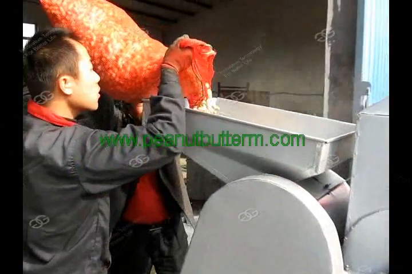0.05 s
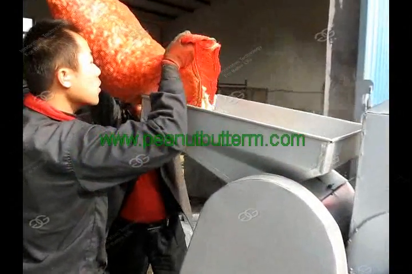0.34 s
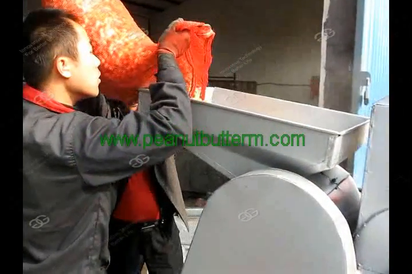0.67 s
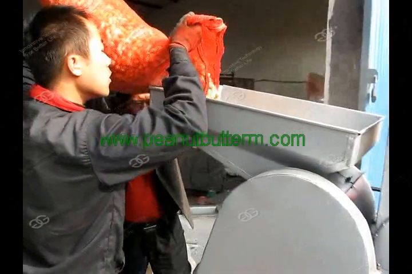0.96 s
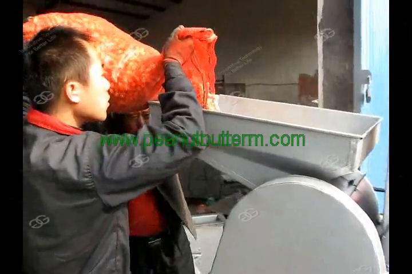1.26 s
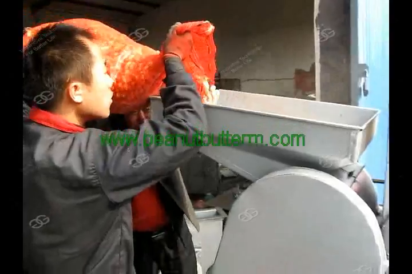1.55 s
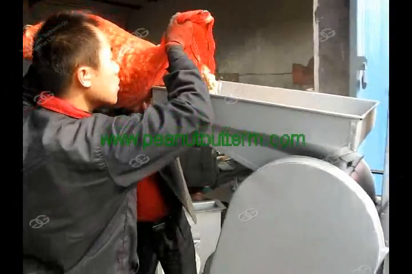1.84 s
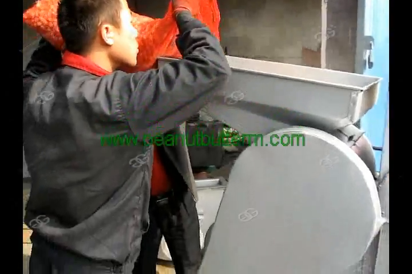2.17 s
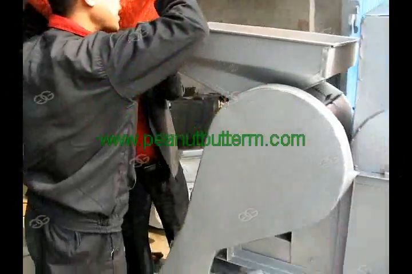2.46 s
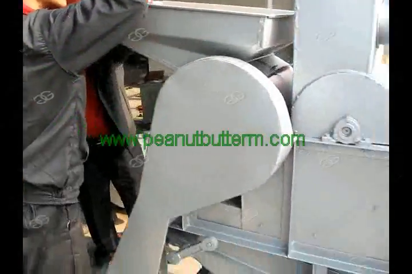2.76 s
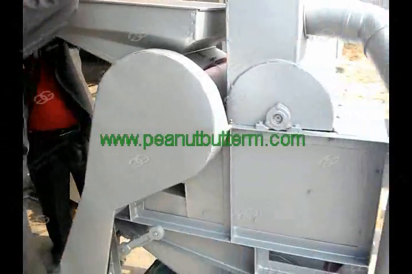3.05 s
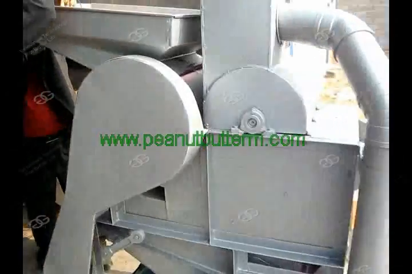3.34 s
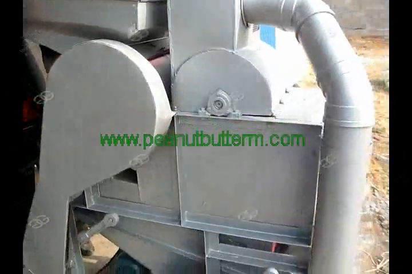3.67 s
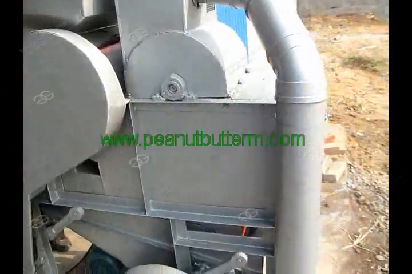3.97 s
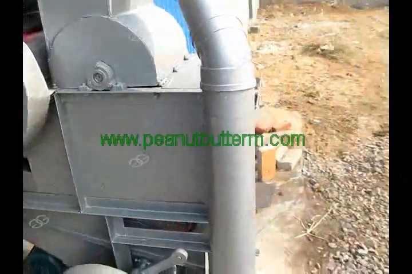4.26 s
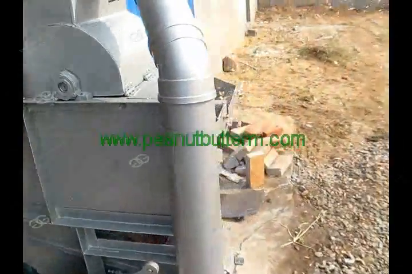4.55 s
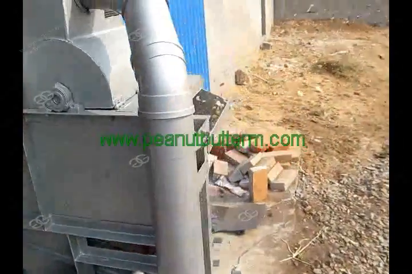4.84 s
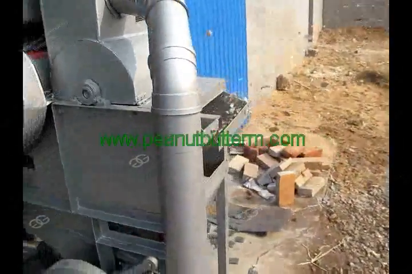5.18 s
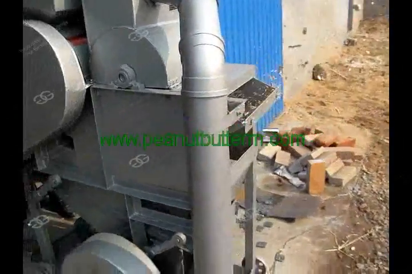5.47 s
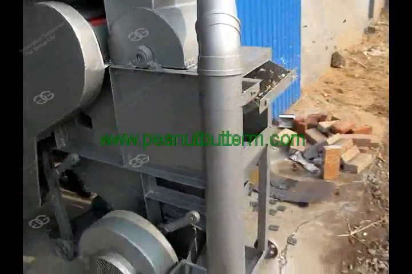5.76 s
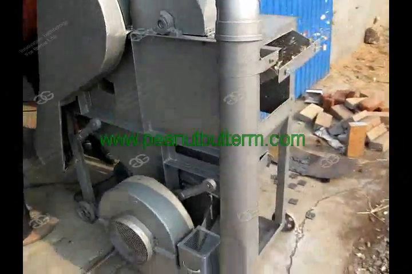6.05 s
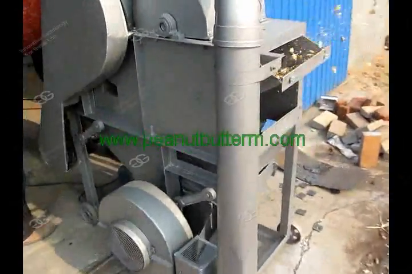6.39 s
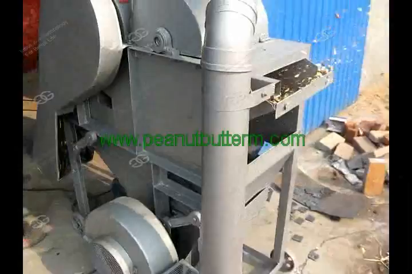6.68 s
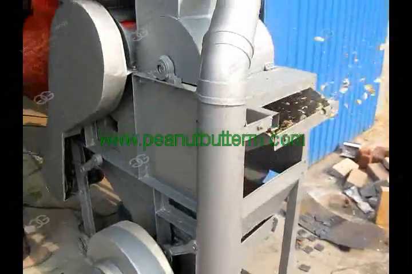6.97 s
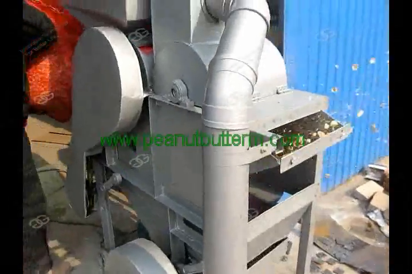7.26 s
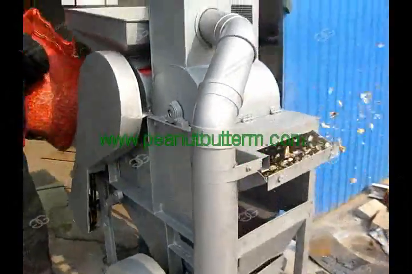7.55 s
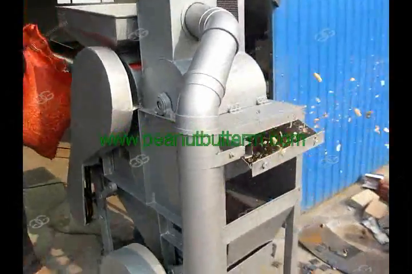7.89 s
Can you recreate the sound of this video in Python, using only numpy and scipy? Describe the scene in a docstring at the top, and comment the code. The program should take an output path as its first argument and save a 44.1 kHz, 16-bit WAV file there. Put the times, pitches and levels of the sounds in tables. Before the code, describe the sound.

Heard close up outdoors, a farm sheller churns through peanuts from start to finish. Its spinning drum makes a rough, rapidly pulsing clatter of pods, topped by the crackle and hiss of breaking shells. Sharp metallic clicks and occasional soft hollow knocks come at irregular moments, while the steel casing rumbles and a fan hums quietly below. The level stays fairly even, with the colour changing gently as the listener walks around it.

```python
"""A peanut sheller runs in a yard, heard by a listener walking round it. Its beater drum turns about
twenty times a second and modulates the noise of many impacts: pods tumble and brittle shells snap,
louder as clumps drop in and softer at gaps in the feed. Kernels ping on the sieve wires, and single
nuts crack and knock against sheet steel that rings in its modes. Underneath, air booms in the
hollow casing and a blower hums; ground and wall return faint echoes of the rattle."""
import sys
import numpy as np
from scipy import signal
from scipy.fft import rfft, irfft, next_fast_len
from scipy.io import wavfile

SR = 44100
rng = np.random.default_rng(int(sys.argv[2]) if len(sys.argv) > 2 else 0)


def output_pcm(signal):
    """Save a mono or channel-first signal as 16-bit PCM at the path in sys.argv[1].

    Samples are clipped to [-1, 1] before scaling.
    """
    pcm = np.clip(np.atleast_2d(signal).T, -1, 1) * 32767
    wavfile.write(sys.argv[1], SR, np.round(pcm).astype(np.int16))


N = 353682
TIME = np.arange(N) / SR
PANEL_BLOWS_PER_S = 200  # on each mode

# modes of the sheet steel: (frequency [Hz], relative level [dB])
STEEL_MODES = [(538, -5.5), (575, -10.5), (635, -7.5), (820, -4.5), (1141, -18), (1655, -13.5),
               (2120, -0.5), (2170, -1), (2300, 0.5), (2410, -1.5), (2790, -4), (3030, -4.5), (3300, 0),
               (3400, 0.5), (3510, -4.5), (3640, -2), (3843, -1.5), (4059, 0.5), (4190, -6), (4560, -7.5),
               (4870, -4.5), (5400, -19), (5530, -12.5), (6200, -26.5)]
# clumps entering the drum: (centre [s], duration [s], pod rise [dB], shell rise [dB], boom rise [dB])
FEED_CLUMPS = [(0.183, 0.075, 1, 3, 3), (0.368, 0.24, 1.5, 1.9, -2), (0.782, 0.079, 1.5, 3, 6),
               (.93, 0.087, -1.5, 2, -4), (1.12, 0.053, -0.5, 3.5, 2), (1.247, 0.13, 2, 1, 3.5),
               (1.438, 0.26, 1, 0.9, 6), (1.656, 0.074, 2.5, 2, -7), (1.895, 0.4, 2.5, 1.2, 6.5),
               (2.265, 0.063, 2, 2.5, 6), (2.464, 0.063, 3, 1, 4), (2.588, 0.1, 3.5, 0, 6.5),
               (2.761, 0.16, 0, 0.5, 8), (2.962, 0.093, 3, 1.5, 10), (3.21, 0.083, -0.5, 1, 12),
               (3.44, 0.19, 4, 2.5, 4.5), (4.178, 0.51, -1, 0.5, 2.5), (4.535, 0.1, -1, -0.2, 4),
               (4.953, 0.13, 2.5, 0.5, 7), (5.24, 0.11, 3, 1.5, 1), (5.374, 0.27, 2, -1, -5),
               (5.47, 0.27, 0.5, 2, 1), (5.736, 0.084, 3.5, 2.5, 3.5), (5.97, 0.27, 1, 1.5, 2.5),
               (6.363, 0.13, 2.5, 0.5, 4), (6.532, 0.17, 2, 0.5, -1), (6.874, 0.22, 2, 1, 3),
               (7.74, 0.28, 1.5, 0, 4)]


def pods(level_db, panel_db):
    """Dense impacts of tumbling pods merge into noise, shaped by three resonances of the hopper panel."""
    # tumbling pods: (frequency [Hz], relative spectral level [dB])
    pod_spectrum = [(150, -25), (230, -20), (300, 1.5), (440, -1.5), (560, 3), (650, 2), (730, -0.5),
                    (910, 0.5), (1030, -4.5), (1250, -7), (1500, -12.5), (2200, -30.5), (4000, -64)]
    tumble = unit_rms(impacts(per_s=4000, spread_db=2.5)) + 1.06 * rng.standard_normal(N)
    body = coloured(tumble * grate_flutter(depth=0.05), pod_spectrum)
    body = lifted(body, hz=456, width_hz=170, db=panel_db)
    body = lifted(body, hz=330, width_hz=35, db=panel_db)
    body = lifted(body, hz=1090, width_hz=100, db=0.5 * panel_db)
    return gain_of(level_db) * body * beater(depth_db=0.5, lead_turns=-0.061)


def shells(level_db, chute_db, sieve_db, bright_db):
    """Brittle fracture: each snap is a damped ring, heard with kernels and the hiss of blown husks."""
    snaps = sum(resonance(impacts(per_s=600, spread_db=1.0), hz, width_hz=640)
                for hz in np.linspace(2200, 6800, 10))
    husk_splits = resonance(impacts(per_s=300, spread_db=4.0), hz=5450, width_hz=550)
    hiss = rng.standard_normal(N)
    # breaking shells: (frequency [Hz], relative spectral level [dB])
    shell_spectrum = [(900, -30.5), (1500, -17.5), (1660, -3.5), (1850, -2.5), (2150, 2), (2380, 2),
                      (2650, -1), (3150, -2.5), (3500, -1), (4100, -1.5), (4850, -5), (5550, -15.5),
                      (6300, -18.5), (7200, -42.5)]
    crackle = unit_rms(snaps) + hiss + 0.5 * kernels() + 0.5 * unit_rms(husk_splits)
    crackle = coloured(crackle, shell_spectrum)
    crackle = lifted(crackle, hz=1630, width_hz=150, db=chute_db)
    crackle = lifted(crackle, hz=3770, width_hz=1000, db=0.7 * sieve_db)
    # the sharpest snaps come just as the beater strikes
    treble = signal.sosfiltfilt(signal.butter(2, 4000, "high", fs=SR, output="sos"), crackle)
    sharp = treble * gain_of(bright_db) * beater(depth_db=1.9, lead_turns=-0.28)
    dull = (crackle - treble) * beater(depth_db=0.7, lead_turns=-0.19)
    bunching_db = 0.47 * wander(per_s=64)  # shells break in small uneven bunches
    return gain_of(level_db + bunching_db) * (dull + sharp) * grate_flutter(depth=0.046)


def beater(depth_db, lead_turns):
    """Amplitude modulation: the beater sweeps through the heap once a turn."""
    # drum rotation: (time [s], speed [turns/s])
    drum_speed = [(0, 20.55), (.5, 20.45), (1.0, 19.96), (2.0, 20.18), (3.0, 20.18), (3.6, 20.05),
                  (4.6, 20.2), (5.4, 20.08), (6.0, 20.2), (6.5, 20.08), (7.0, 20.34), (7.5, 20.0),
                  (8.0, 20.0)]
    turns = np.cumsum(follow(drum_speed)[0]) / SR + lead_turns
    return unit_rms(gain_of(depth_db * np.cos(2 * np.pi * turns)))


def grate_flutter(depth, bar_hz=107.8):
    """Pods dragged over the grate bars modulate the rattle fast enough to be heard as roughness."""
    return 1 + depth * np.sin(2 * np.pi * bar_hz * TIME)


def feed(empty_s=0.0066):
    """Impact noise follows the load: clumps and gaps set the levels of pods, shells and boom in dB."""
    # running levels: (time [s], pods [dB], shells [dB], casing boom [dB])
    running_levels = [(0, -27.5, -26, -35.5), (1, -28, -26.5, -37.5), (2, -28.5, -26.5, -39.5),
                      (3, -27.5, -25, -39.5), (4, -25.5, -25.5, -34), (5, -28, -24, -32.5),
                      (6, -28, -25, -36), (7, -28.5, -25, -35), (8, -27.5, -23.5, -36.5)]
    # the heap breaks through and the drum starves: (start [s], refill time [s], pod dip [dB])
    feed_gaps = [(.402, 0.1, -1.5), (.64, 0.05, -2), (.79, 0.061, -2), (.997, 0.14, -1.1),
                 (1.315, 0.036, -2), (1.555, 0.054, -2), (1.7, 0.08, -1.5), (2.035, 0.066, -0.5),
                 (2.19, 0.043, -1.5), (2.79, .09, -1.5), (3.0, 0.16, -3.5), (3.54, 0.065, -2.5),
                 (4.365, 0.088, -2), (4.735, 0.13, -3), (5.06, 0.17, -2), (6.022, 0.044, -3),
                 (6.12, .045, -2), (6.557, 0.077, -2.5), (6.712, 0.14, -3), (7.24, 0.039, -0.5),
                 (7.5, 0.19, -1.5)]
    pods_db, shells_db, boom_db = follow(running_levels)
    for s, length, pods_rise, shells_rise, boom_rise in FEED_CLUMPS:
        clump = swell(s, length)
        pods_db += pods_rise * clump
        shells_db += shells_rise * clump
        boom_db += boom_rise * clump
    gap_db = np.zeros(N)
    for s, refill_s, dip_db in feed_gaps:
        emptying = np.interp(TIME - s, [0, empty_s], [0, 1])
        gap_db += dip_db * emptying * swell(s, 2 * refill_s)
    churn_db = 0.02 * wander(per_s=14)  # the heap shifts at random
    return pods_db + gap_db + churn_db, shells_db + 1.25 * gap_db + churn_db, boom_db + 1.5 * gap_db


def cushioning():
    """Softer impacts carry less treble: a heavy clump cushions the beater, lowering brightness in dB."""
    return -0.35 * sum(pods_rise * swell(s, length) for s, length, pods_rise, _, _ in FEED_CLUMPS)


def kernels(wires=44):
    """Impulse response: each kernel lands on one sieve wire, which pings at its natural frequency."""
    pitches = np.linspace(2900, 6000, wires) + rng.uniform(-36.5, 35, wires)
    return unit_rms(sum(resonance(impacts(per_s=9, spread_db=0.5), hz, width_hz=24) for hz in pitches))


def nut_cracks(t60_s=0.043, clatter_s=0.0056):
    """Modal ringing: a nut shatters on the steel, and each point struck excites its own mix of modes."""
    # single nuts: (time [s], peak level [dB], centre frequency [Hz], bandwidth [Hz])
    strikes = [(.165, -18, 3700, 1200), (0.546, -21, 3900, 2500), (.595, -19, 4200, 2000),
               (0.848, -15, 4110, 2500), (.932, -19, 4300, 1500), (1.235, -19, 4000, 1500),
               (1.54, -19, 4000, 1200), (1.686, -19, 3880, 1200), (1.789, -16, 3750, 1490),
               (1.946, -17.5, 4200, 1500), (1.984, -19, 3860, 1500), (2.081, -17, 3840, 1500),
               (2.146, -14.5, 3870, 2500), (2.633, -17.5, 3700, 1000), (2.978, -18, 3600, 1500),
               (3.124, -14.5, 4150, 400), (3.179, -21, 4600, 2000), (3.329, -15, 3200, 1800),
               (3.533, -16, 4900, 3000), (4.022, -17, 3850, 2500), (4.215, -15, 3470, 2500),
               (4.467, -16, 4000, 1500), (4.711, -14.5, 3900, 1500), (6.013, -14, 3670, 1200),
               (6.528, -18, 3900, 1500), (6.643, -17, 3950, 1200), (6.903, -16, 4500, 2500),
               (7.199, -17, 4100, 800), (7.351, -21, 3600, 1200), (7.489, -15, 3410, 2500),
               (7.591, -14, 3900, 1500), (7.678, -14, 3700, 1500), (7.811, -15, 3700, 2000)]
    out, t = np.zeros(N), np.arange(SR // 15) / SR
    hz, mode_db = np.transpose(STEEL_MODES)
    weights = gain_of(mode_db) * hz ** 2  # favours the high modes
    modes = weights[:, None] * np.sin(2 * np.pi * hz[:, None] * t) * np.exp(-np.log(1000) * t / t60_s)
    bright_band = signal.butter(4, [2600, 6000], "band", fs=SR, output="sos")
    for s, db, crack_hz, width_hz in strikes:
        ring = resonance(rng.standard_normal(len(hz)) @ modes, crack_hz, width_hz)
        clatter = resonance(rng.standard_normal(len(t)), crack_hz, width_hz)
        clatter *= np.exp(-(t / clatter_s) ** 2)
        crack = signal.sosfilt(bright_band, unit_peak(ring) + unit_peak(clatter))
        add(out, s, gain_of(db) * unit_peak(crack))
    return out


def pod_knocks(level_db=-4.5, attack_s=0.005, decay_s=0.0098, width_hz=260):
    """A thrown pod excites a heavily damped resonance of the casing: a rough, hollow knock."""
    # single pods: (time [s], relative peak level [dB], pitch [Hz])
    throws = [(0.764, -12.5, 503), (0.968, -13, 517), (1.921, -19, 554), (2.105, -13, 640),
              (2.907, -13, 530), (3.462, -12, 580), (3.617, -15.5, 660), (4.694, -24, 680),
              (5.136, -13, 640), (5.382, -16.5, 568), (7.15, -16, 610), (7.671, -14, 630)]
    out, t = np.zeros(N), np.arange(SR // 12) / SR
    envelope = (1 - np.exp(-t / attack_s)) ** 2 * np.exp(-t / decay_s)
    for s, db, hz in throws:
        contact = rng.standard_normal(len(t)) * envelope
        knock = resonance(resonance(contact, hz, width_hz), hz, 2 * width_hz)
        add(out, s, gain_of(db + level_db) * unit_peak(knock))
    return out


def panels(shells_db, level_db=-8.0, swing_db=3.0):
    """Directional radiation: each panel mode, driven by the nuts, varies with the listener's angle."""
    # the drum cover rings harder as nuts hit it: (time [s], lift [dB])
    cover_lift = [(0, -2), (1.0, 0.5), (1.35, 7), (1.85, 5.5), (2.15, -2.5), (3.1, -4), (3.35, 2),
                  (4.2, 4.5), (5.5, 1.5), (6.3, -1), (6.9, -4), (7.25, 4), (8, 2)]
    ring = np.zeros(N)
    for hz, db in STEEL_MODES:
        radiation = gain_of(db + swing_db * wander(per_s=1.6))
        ring += radiation * resonance(impacts(PANEL_BLOWS_PER_S, spread_db=0.7), hz, width_hz=24)
    ring = lifted(unit_rms(ring), hz=2320, width_hz=380, db=follow(cover_lift)[0])
    return gain_of(shells_db + level_db) * ring * beater(depth_db=-1.5, lead_turns=-0.17)


def housing(shells_db, hz=917, width_hz=13):
    """Random excitation by the nuts sustains one lightly damped mode of the housing."""
    # strongest on the outlet side: (time [s], level relative to the shells [dB])
    mode_level = [(0, -16.5), (4.4, -31.5), (5.1, -19.5), (6.1, -17.5), (6.8, -25.5), (8, -16)]
    blows = impacts(PANEL_BLOWS_PER_S, spread_db=5.5)
    ring = resonance(resonance(blows, hz, width_hz), hz, 2 * width_hz)
    return gain_of(shells_db + follow(mode_level)[0]) * unit_rms(ring)


def casing(boom_db, draught_db):
    """Cavity resonance: churned air booms in the hollow steel box, over the fan's low draught."""
    # air in the box: (frequency [Hz], relative spectral level [dB])
    boom_spectrum = [(120, -31.5), (170, -17.5), (195, -0.5), (222, 4), (245, 0), (275, -3), (340, -18.5),
                     (600, -57)]
    # fan draught: (frequency [Hz], relative spectral level [dB])
    draught_spectrum = [(20, -22), (45, -20), (72, -5), (100, -1.5), (120, 0.5), (150, 6.5), (200, 5),
                        (400, -41)]
    boom = gain_of(boom_db) * coloured(rng.standard_normal(N), boom_spectrum)
    draught = gain_of(draught_db) * coloured(rng.standard_normal(N), draught_spectrum)
    return boom * beater(depth_db=1.5, lead_turns=-0.31) + draught


def blower(shaft_hz=84.6, third_db=-3.5, throb_period_s=1.325, throb_peak_s=1.49):
    """The fan hums in three harmonics; its octave beats against a motor tone of nearly equal pitch."""
    # hum: (time [s], shaft tone [dB], octave [dB], motor tone relative to the octave [dB])
    hum_levels = [(0, -48.5, -39.5, -10), (.7, -52.5, -44.5, -4), (1.0, -60, -39, -8),
                  (1.65, -59, -43.5, -6.5), (1.85, -52, -39.5, -9), (2.3, -55, -44, -11),
                  (2.5, -56, -39, -8), (3.0, -51, -43, -11), (3.6, -57, -46, -7), (3.85, -56, -44, -6),
                  (4.2, -51.5, -42.5, -4), (4.9, -45.5, -48, -2), (5.4, -48, -42.5, 2),
                  (6.0, -48.5, -46.5, -1), (6.3, -58, -50, 5), (6.6, -57.5, -47.5, 1),
                  (6.9, -50.5, -44, -1), (7.3, -46.5, -45.5, 1), (7.55, -45.5, -49, -6),
                  (7.75, -44, -41.5, -2), (8, -43.5, -41, -3)]
    # thin tones of the drive: (frequency [Hz], rms level [dB])
    drive_tones = [(152, -54), (793, -45.5), (1067, -49)]
    shaft_db, octave_db, motor_db = follow(hum_levels)
    angle = wavering_phase(shaft_hz, depth=0.0015, per_s=6)
    slip = 2 * np.pi * (TIME - throb_peak_s) / throb_period_s
    octave = np.sin(2 * angle) + gain_of(motor_db) * np.sin(2 * angle - slip)
    shaft = np.sin(angle) + gain_of(third_db) * np.sin(3 * angle)
    hum = gain_of(shaft_db) * shaft + gain_of(octave_db) * octave
    hum *= gain_of(0.56 * wander(per_s=9.5))
    for hz, db in drive_tones:
        amplitude = gain_of(db + 0.78 * wander(per_s=3.1))
        hum += amplitude * np.sin(wavering_phase(hz, depth=0.003, per_s=13))
    return np.sqrt(2) * hum


def yard(direct, echo_gain=0.056, drift_s=0.00029):
    """Early reflections from ground and wall, whose delays drift as the listener walks."""
    echoes = sum(np.interp(TIME - delay_s - drift_s * wander(per_s=0.71), TIME, direct)
                 for delay_s in (0.0043, 0.0091))
    return (direct + echo_gain * echoes) / np.sqrt(1 + 2 * echo_gain ** 2)


def impacts(per_s, spread_db):
    """Shot noise: random impulses of either sign, a few much harder than the rest."""
    when, hardness, side = rng.random((int(per_s * N / SR), 3)).T
    strength_db = spread_db * np.minimum(-np.log(1 - hardness), 4)
    return np.bincount((when * N).astype(int), gain_of(strength_db) * np.sign(side - 0.5), N)


def resonance(x, hz, width_hz):
    """A damped resonator: a band-pass of gain 1 at its centre."""
    return signal.lfilter(*signal.iirpeak(hz, hz / width_hz, SR), x + 1e-12)


def lifted(x, hz, width_hz, db):
    """A peaking filter: raises or lowers one resonance by a curve in dB."""
    return x + (gain_of(db) - 1) * resonance(x, hz, width_hz)


def coloured(x, spectrum):
    """Spectral shaping of x, returned at rms 1."""
    size = next_fast_len(N)
    hz, db = np.transpose(spectrum)
    bin_hz = np.fft.rfftfreq(size, 1 / SR)
    gain = gain_of(np.interp(np.log(bin_hz + 1), np.log(hz), db))
    return unit_rms(irfft(rfft(x, size) * gain, size)[:N])


def wander(per_s):
    """A slow random fluctuation of about rms 1."""
    knots = rng.standard_normal(1200)
    return np.interp(TIME, np.arange(len(knots)) / per_s, knots) * np.sqrt(3 / 2)


def wavering_phase(hz, depth, per_s):
    """Phase in radians: the integral of a wandering frequency."""
    return 2 * np.pi * np.cumsum(hz * (1 + depth * wander(per_s))) / SR


def swell(middle_s, length_s):
    """A raised-cosine pulse of height 1."""
    t = TIME - middle_s
    return np.where(abs(t) < length_s / 2, np.cos(np.pi * t / length_s) ** 2, 0)


def follow(table):
    """Linear interpolation of each column over time."""
    s, *columns = np.transpose(table)
    return [np.interp(TIME, s, column) for column in columns]


def gain_of(db):
    """Decibels to amplitude."""
    return 10 ** (np.asarray(db) / 20)


def unit_rms(x):
    """Scales to rms 1."""
    return x / np.sqrt(np.mean(x ** 2) + 1e-20)


def unit_peak(x):
    """Scales to peak 1."""
    return x / abs(x).max()


def add(mix, start_s, sound):
    """Superposes a sound on the mix."""
    part = mix[round(start_s * SR):][:len(sound)]
    part += sound[:len(part)]


def scene():
    """Superposition of the machine's parts, coloured by the side that faces the listener."""
    # directivity: (time [s], hopper panel [dB], chute [dB], sieve [dB], brightness [dB], draught [dB])
    facing = [(0, 3, 5.5, -3.5, 4, -38.5), (.8, 2, 6.5, -4, 2.5, -42), (1.6, 2, 5.5, 0, 2, -41),
              (2.4, -1, 0.5, 0, 1, -41), (3.2, -2, -3.5, -3, -0.5, -43.5), (4.0, -5.5, 1.5, 1, 0.5, -42.5),
              (4.8, -4, 1.5, -1.5, 1, -48), (5.4, -1, 5.5, 0, -2.5, -41.5), (6.2, -1.5, 0, 3, -2.5, -46),
              (7.0, 0.5, 5.5, 3, 0, -47.5), (8, -2.5, 5, 1.5, -5, -43)]
    panel_db, chute_db, sieve_db, bright_db, draught_db = follow(facing)
    pods_db, shells_db, boom_db = feed()
    rattle = pods(pods_db, panel_db) + shells(shells_db, chute_db, sieve_db, bright_db + cushioning())
    rattle += panels(shells_db) + housing(shells_db) + nut_cracks() + pod_knocks()
    return (blower() + casing(boom_db, draught_db) + yard(rattle))[None]


def record(dry):
    """Soft saturation rounds the tallest peaks; low-pass filters cut the treble; a small offset stays."""
    ceiling, offset = 0.4, -0.0057
    rounded = dry / (1 + (dry / ceiling) ** 6) ** (1 / 6)
    soft = signal.sosfilt(signal.butter(10, 6600, fs=SR, output="sos"), rounded) + offset
    band_edge = signal.firwin(301, 7300, window=("kaiser", 9), fs=SR)
    return signal.oaconvolve(soft, band_edge[None], "same")


dry = scene()
out = record(dry)
output_pcm(out)
```